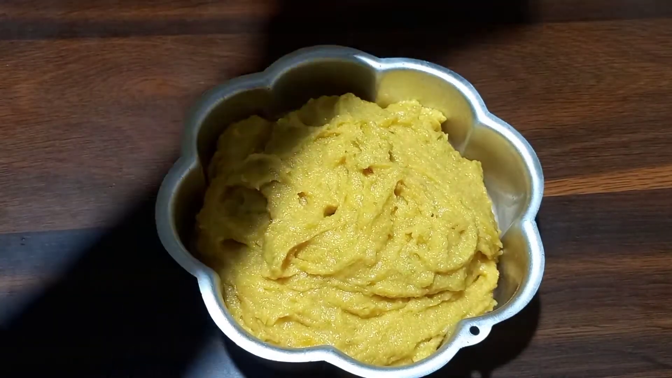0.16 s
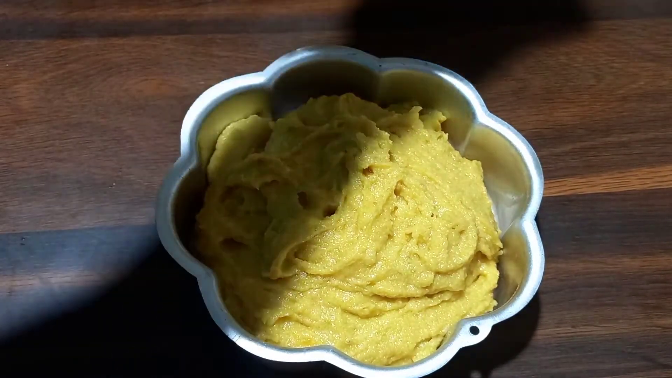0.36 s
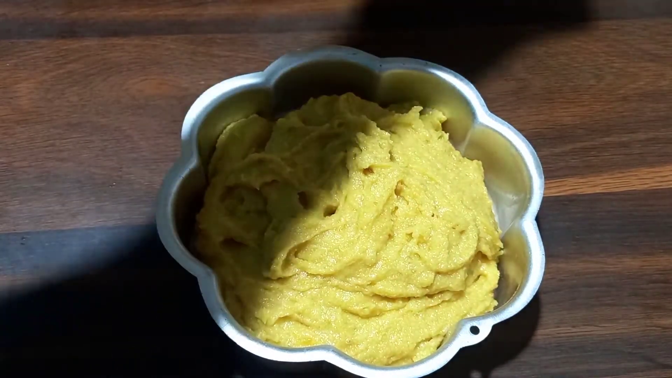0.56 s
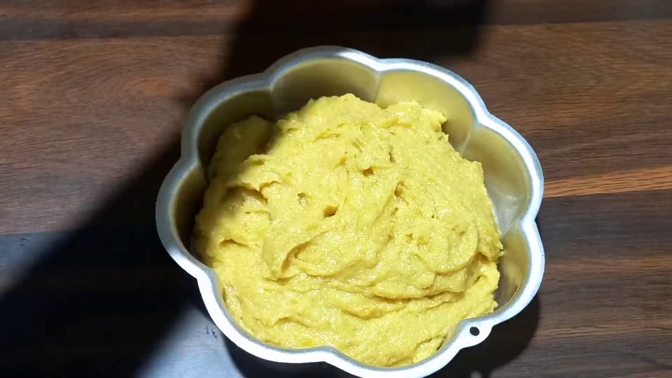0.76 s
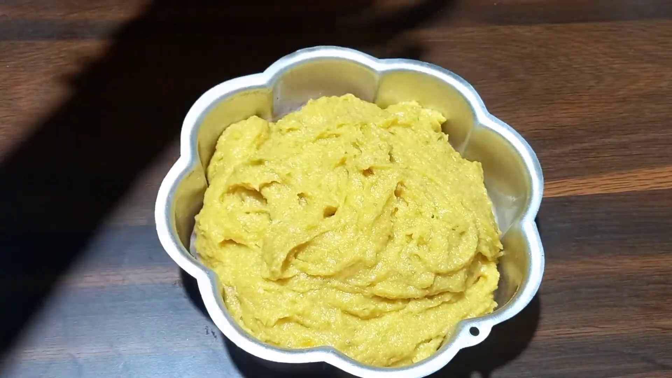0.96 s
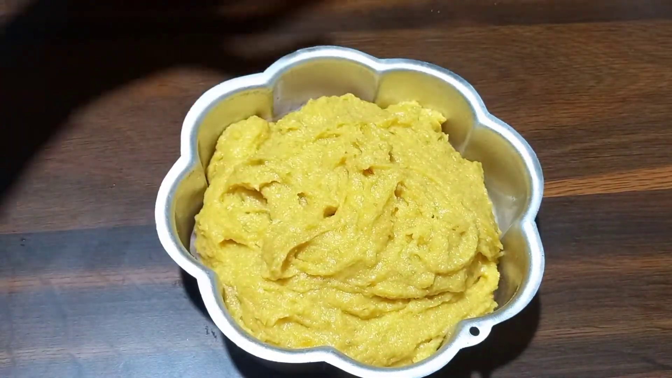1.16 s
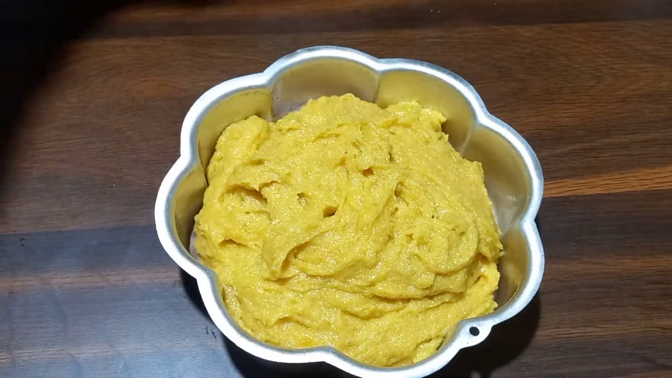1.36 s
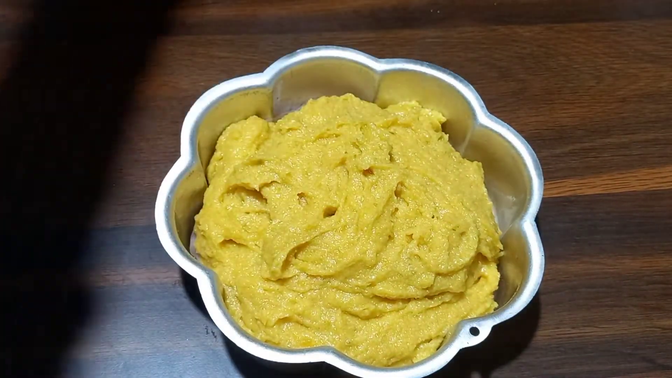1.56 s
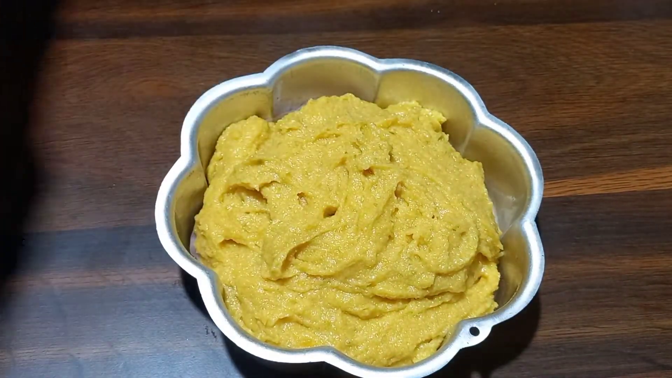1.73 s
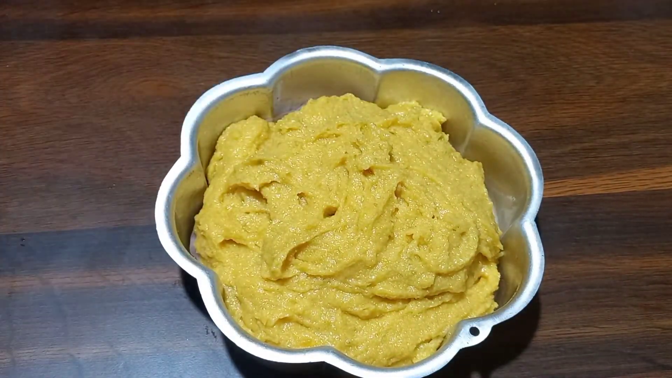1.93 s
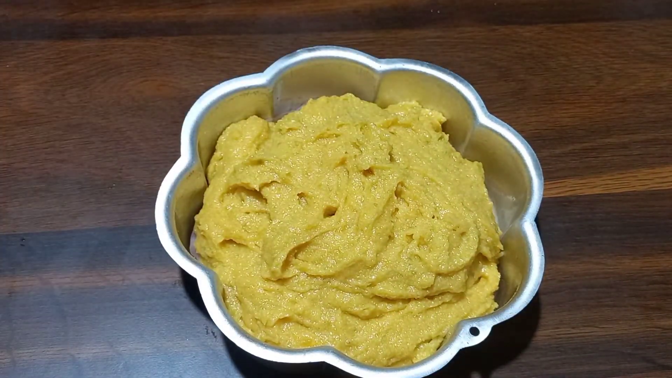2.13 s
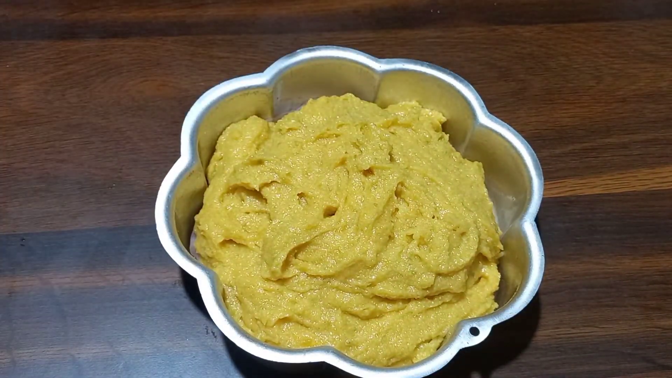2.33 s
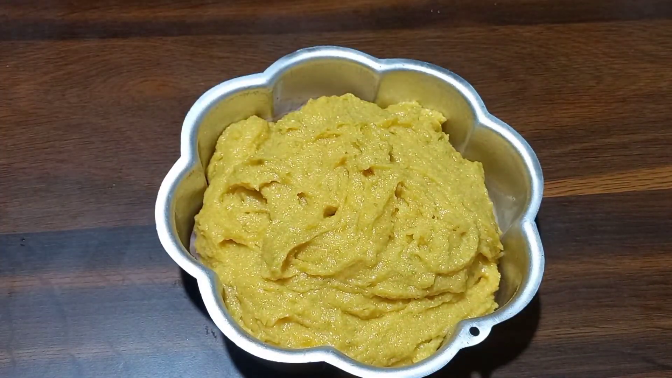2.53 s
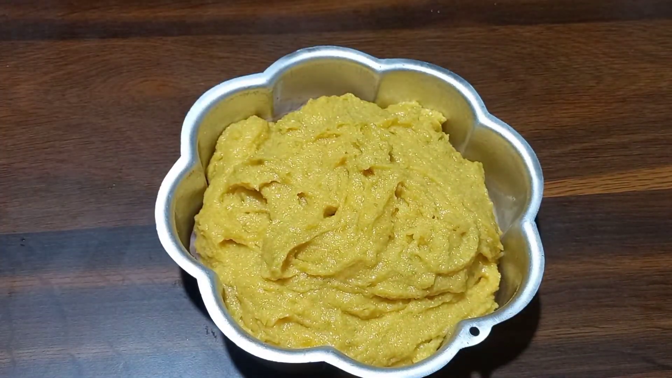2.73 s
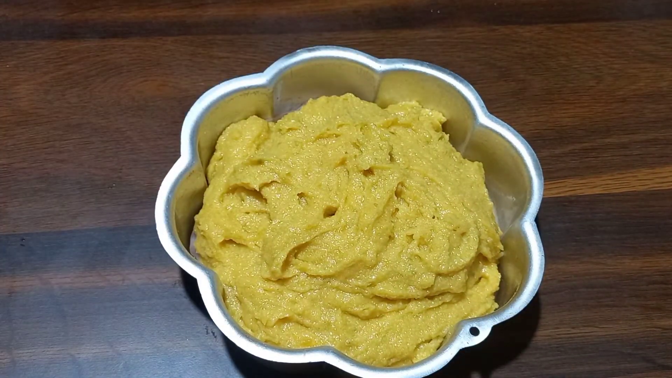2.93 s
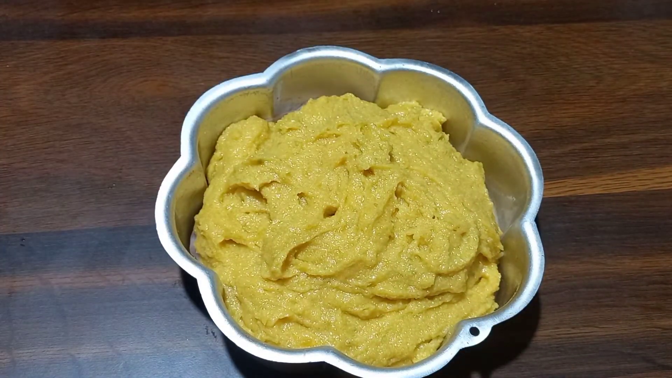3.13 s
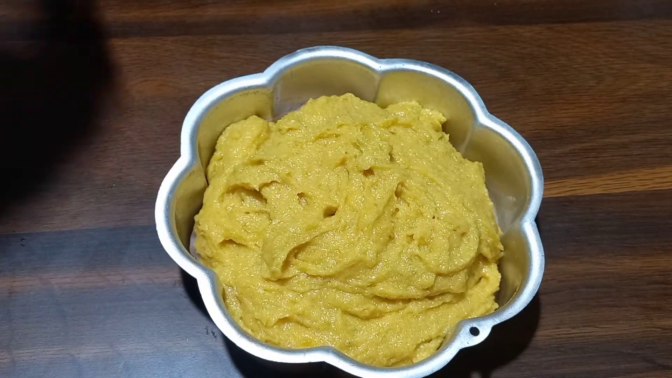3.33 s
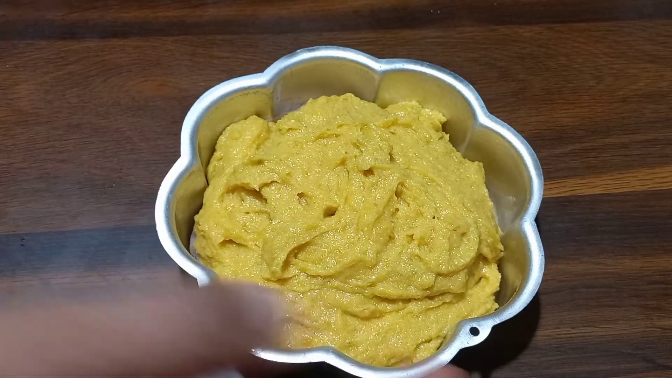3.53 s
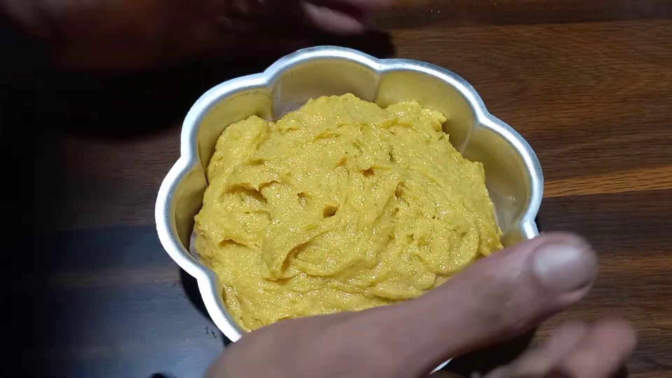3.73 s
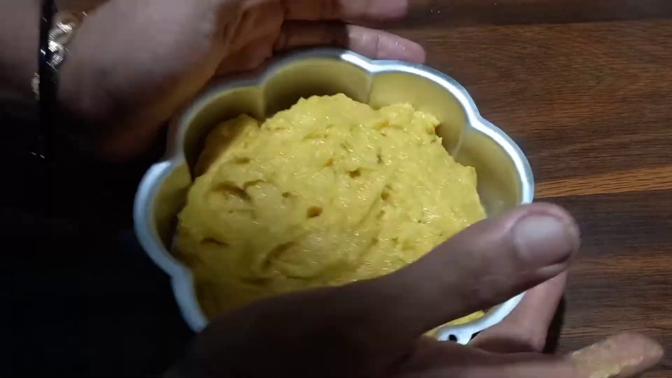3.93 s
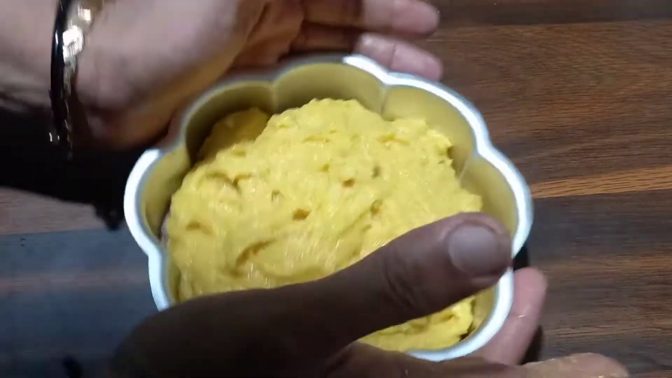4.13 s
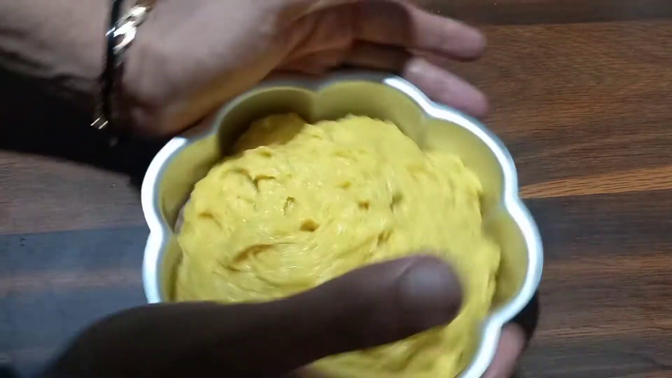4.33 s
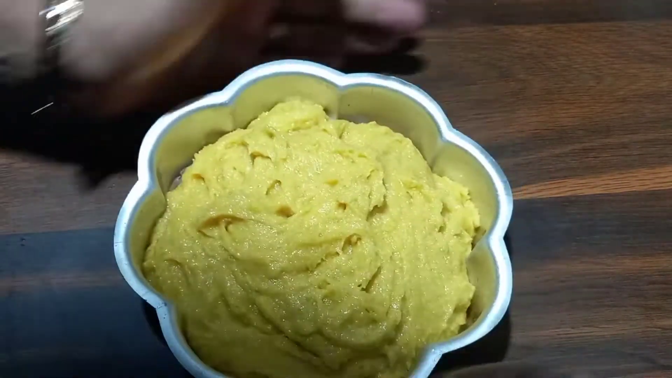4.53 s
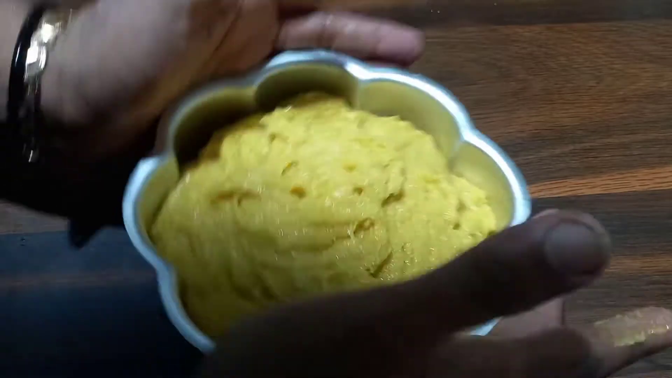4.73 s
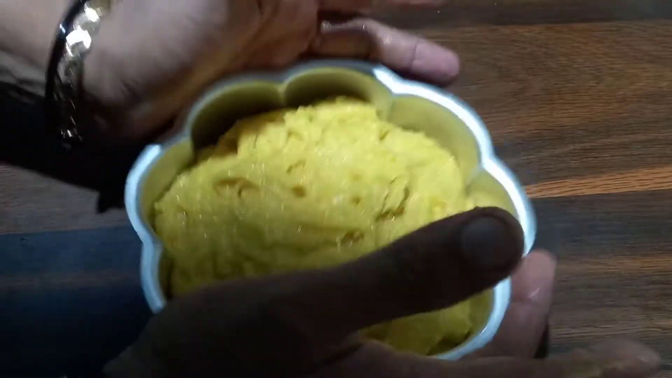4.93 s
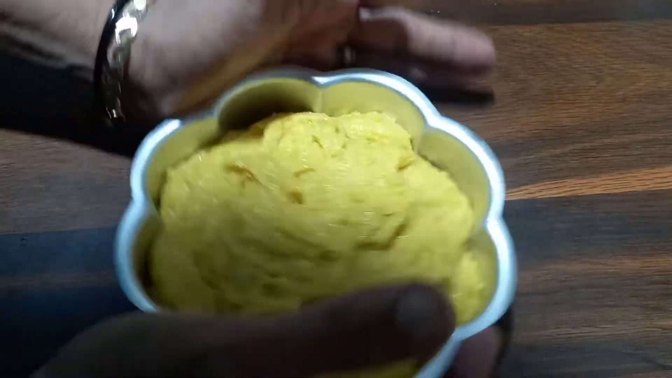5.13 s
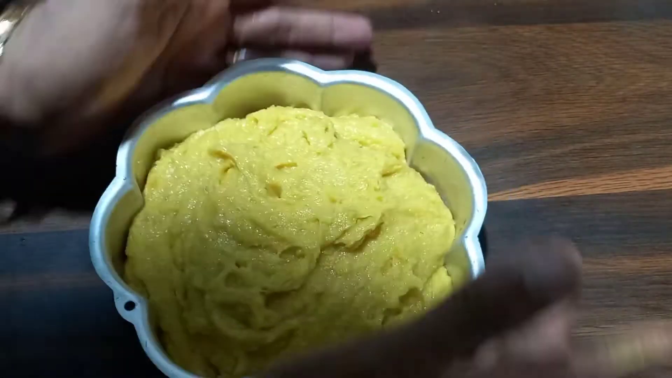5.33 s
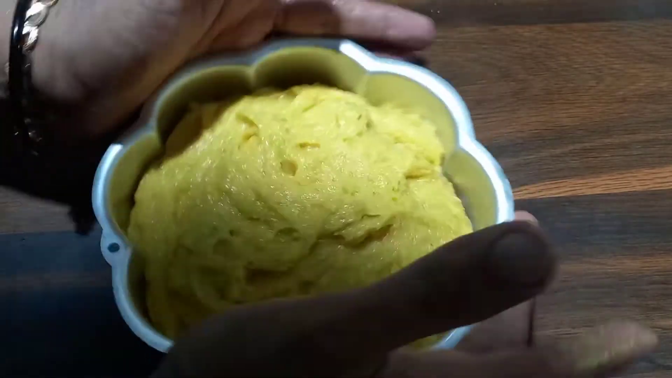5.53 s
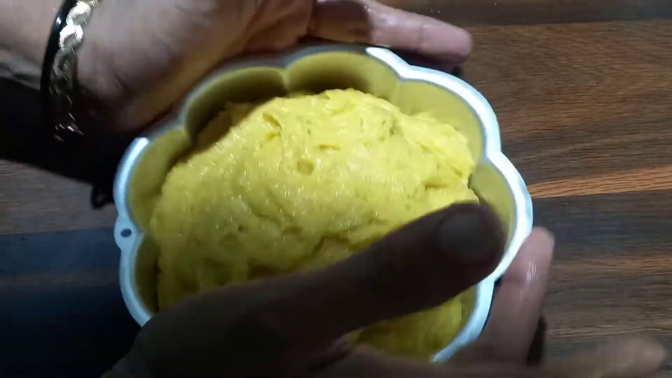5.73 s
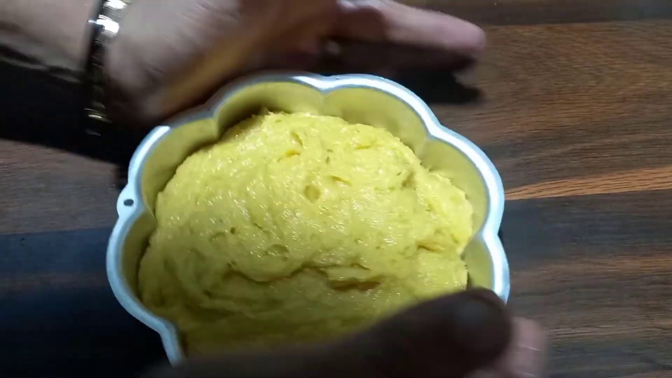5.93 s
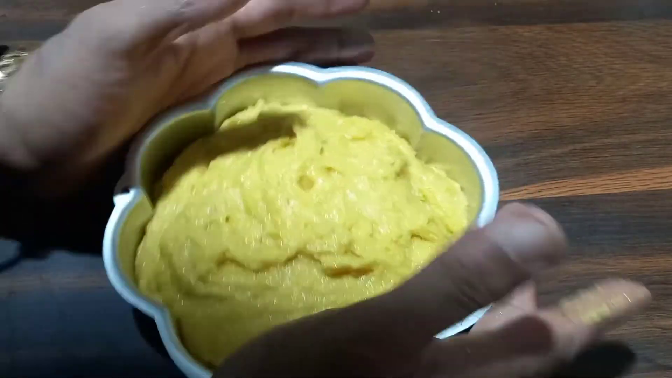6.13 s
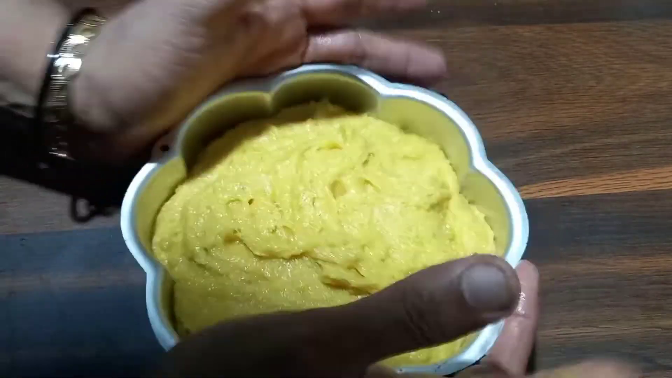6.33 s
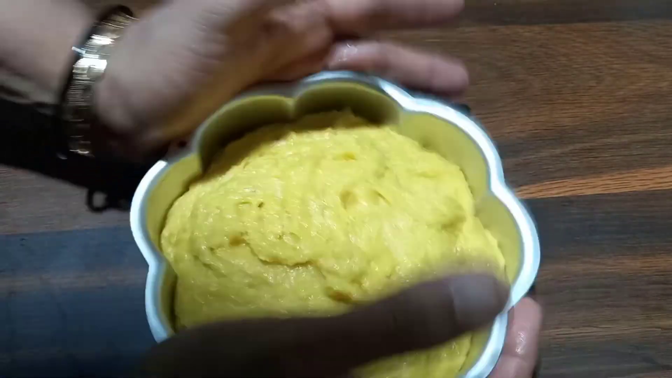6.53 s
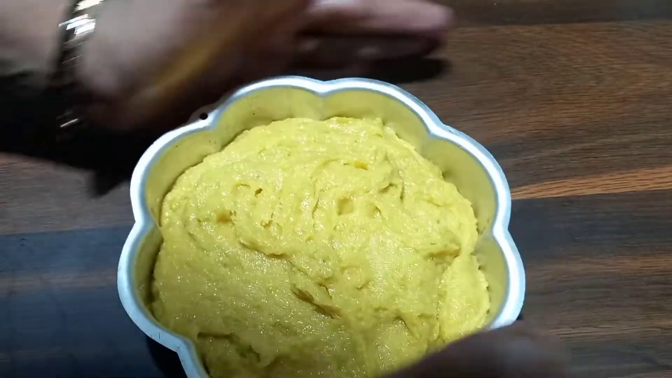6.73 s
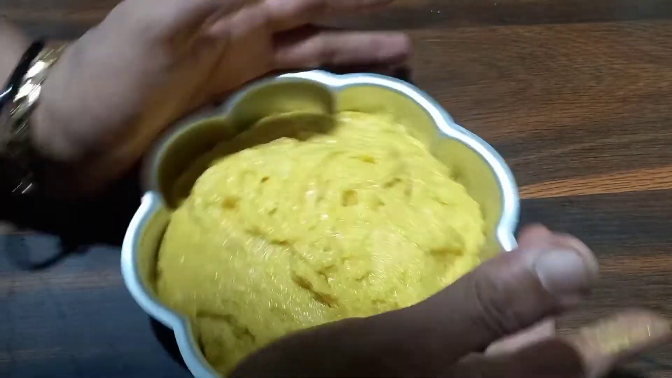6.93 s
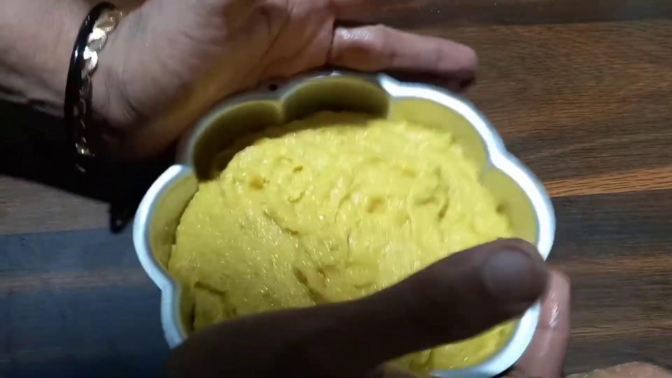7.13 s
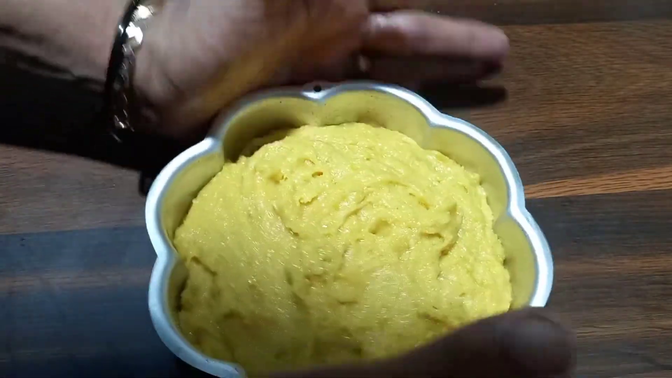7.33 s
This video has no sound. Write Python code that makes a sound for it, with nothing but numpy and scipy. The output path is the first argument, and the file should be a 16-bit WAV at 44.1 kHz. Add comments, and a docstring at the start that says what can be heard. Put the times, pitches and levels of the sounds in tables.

```python
"""Two dull, hollow bumps and a few faint scrapes sound in a small, hard kitchen. Then a metal cake tin
full of batter is lifted and knocked down on a wooden counter, in five pairs of knocks. Each impact
excites a thud of the base and a clank of the wall, both damped by the batter; the counter booms in
its low modes and the room reverberates. Two charms on the cook's bracelet tinkle as the wrist moves
and after each knock."""
import sys
import numpy as np
from scipy import signal
from scipy.fft import rfft, irfft
from scipy.io import wavfile
from scipy.ndimage import uniform_filter1d

SR = 44100
rng = np.random.default_rng(int(sys.argv[2]) if len(sys.argv) > 2 else 0)


def store_wav(level_fs):
    """Save 16-bit WAV to argv[1]."""
    pcm = np.round(np.clip(np.atleast_2d(level_fs), -1, 1) * 32767)
    wavfile.write(sys.argv[1], SR, pcm.T.astype(np.int16))


N = 329868
TIME = np.arange(N) / SR

# The tin lands on an edge, falls flat, then rocks once. Levels in all tables are relative.
# (time [s], edge level [dB], wall's share of edge [0-1], fall time [s], flat level [dB],
#  wall's share of flat [0-1], rock time [s], weight on counter [dB], bracelet jolt [dB])
KNOCKS = [(4.0766, -14, 0.17, 0.011, -9.5, 0.98, 0.0098, -31.5, -40.5),
          (4.2803, -18.5, 0.02, 0.0041, -9.5, 0.55, .018, -30, -43),
          (4.8728, -11, 0.98, 0.0089, -15.5, .8, 0.013, -35.5, -43),
          (5.0276, -8, 0.08, .0219, -11.5, 0.94, .016, -32.5, -42),
          (5.6244, -12.5, 0.85, .0036, -14.5, 0.94, .02, -38, -52),
          (5.7974, -14, 0.04, .0108, -11.5, 0.24, 0.0037, -35, -48.5),
          (6.331, -13, 0.24, .0154, -11, 0.78, .017, -30.5, -46),
          (6.5039, -13, 0.19, 0.016, -12, 0.55, .005, -32, -49),
          (7.065, -14, 0.59, 0.014, -10.5, 0.38, 0.0034, -38.5, -68),
          (7.213, -14, 0.14, 0.026, -10.5, 0.34, .004, -36, -46.5)]


def from_db(db):
    """Amplitude grows tenfold with every 20 dB."""
    return 10 ** (np.asarray(db) / 20)


def at_hz(points, hz):
    """Interpolation on a logarithmic frequency axis."""
    known_hz, values = np.transpose(points)
    return np.interp(np.log(np.maximum(hz, 1)), np.log(known_hz), values)


def unit_energy(x):
    """Energy normalisation: each channel's squares sum to one."""
    return x / np.sqrt(np.sum(x ** 2, axis=-1, keepdims=True) + 1e-20)


def through(x, response):
    """A linear system convolves its input with its impulse response."""
    return signal.oaconvolve(np.atleast_2d(x), np.atleast_2d(response), axes=-1)[:, :N]


def coloured(x, spectrum, size=4096):
    """Minimum-phase filtering: a causal response of the given spectral shape and unit energy."""
    hz = np.arange(size // 2 + 1) * SR / size
    cepstrum = irfft(np.log(from_db(at_hz(spectrum, hz))))
    cepstrum[1:size // 2] *= 2
    cepstrum[size // 2 + 1:] = 0
    return through(x, unit_energy(irfft(np.exp(rfft(cepstrum)))))


def stereo_noise(count, apart_hz, width):
    """Interaural coherence: noise is alike at both ears in the bass and differs above apart_hz."""
    mid, side = rng.standard_normal((2, count))
    side = width * signal.lfilter(*signal.butter(1, apart_hz, "high", fs=SR), side)
    return np.array([mid + side, mid - side]) / np.sqrt(1 + width ** 2)


def flattened(x):
    """Spectral whitening gives a burst about the same energy density in every band."""
    spectrum = rfft(x)
    power = uniform_filter1d(np.mean(np.abs(spectrum) ** 2, axis=0), size=160)
    return unit_energy(irfft(spectrum / np.sqrt(power + 1e-20), x.shape[1]))


def impacts(times, levels_db, snap, rise_s, crack_t60, tail_db, tail_t60, apart_hz, width, size=8192):
    """Impact transients: an impulse (snap), a noisy crack of dense modes and a weaker, longer tail."""
    out, t = np.zeros((2, N + size)), TIME[:size]
    decay = from_db(-60 * t / crack_t60) + from_db(tail_db - 60 * t / tail_t60)
    envelope = decay * (1 - np.exp(-t / rise_s))
    for s, level_db in zip(times, levels_db):
        burst = unit_energy(stereo_noise(size, apart_hz, width) * envelope)
        burst[:, 0] += snap
        start = int(s * SR)
        out[:, start:start + size] += from_db(level_db) * flattened(burst) * (1 - t / t[-1])
    return out[:, :N]


def ringing(times, levels_db, modes, scatter_db, pan_db, detune, phase_spread, rise_s, size=22050):
    """Modal superposition: damped sinusoids whose strength, side and pitch vary from blow to blow."""
    out, t = np.zeros((2, N + size)), TIME[:size]
    hz, mode_db, t60 = np.transpose(modes)
    decay = from_db(-60 * t / t60[:, None]) * (1 - np.exp(-t / rise_s))
    sides = np.array([[1], [-1]])
    for s, level_db in zip(times, levels_db):
        strength, side, shift, lag = rng.standard_normal((4, len(hz)))
        gain = from_db(level_db + mode_db + scatter_db * strength + pan_db * side * sides)
        angle = (2 * np.pi * (hz * (1 + detune * shift))[:, None] * t).astype(np.float32)
        phase = phase_spread * lag * sides   # each mode reaches the two ears out of step
        start = min(int(s * SR), N)
        out[:, start:start + size] += (gain * np.cos(phase)) @ (decay * np.sin(angle))
        out[:, start:start + size] += (gain * np.sin(phase)) @ (decay * np.cos(angle))
    return out[:, :N]


def still_air():
    """Ambient noise: a faint, stationary background, strongest in the bass."""
    # room tone (frequency [Hz], level [dB])
    air_spectrum = [(18, -47.5), (30, -18), (86, 1), (161, -11.5), (204, -16), (499, -18), (937, -27),
                    (2120, -28), (3870, -33.5), (4420, -21.5), (5590, -23.5), (7090, -14), (7870, -31.5),
                    (14800, -34), (16000, -44.5)]
    return from_db(-66.5) * coloured(stereo_noise(N, apart_hz=300, width=0.94), air_spectrum)


def kitchen(x, build_s=0.0045, size=32768):
    """Reverberation: dense reflections build up, then decay exponentially at each band's own rate."""
    # colour of the reflections (frequency [Hz], level [dB])
    room_spectrum = [(50, -11), (150, 8.5), (270, 3), (480, 1), (1000, 1), (2000, -3), (4000, -2.5),
                     (7000, -4.5), (15000, 4)]
    # reverberation time (frequency [Hz], T60 [s])
    room_t60 = [(80, 0.78), (250, 0.41), (500, 0.55), (2000, 0.58), (5000, 0.53), (9000, 0.47),
                (15000, 0.28)]
    t, hz = TIME[:size], np.arange(size // 2 + 1) * SR / size
    noise, response = rfft(stereo_noise(size, apart_hz=280, width=0.67)), 0
    centres = np.geomspace(60, 16000, 12)
    for centre, band_weights in zip(centres, np.eye(len(centres))):
        band = irfft(noise * at_hz(np.column_stack([centres, band_weights]), hz))
        response = response + band * from_db(-60 * t / at_hz(room_t60, centre))
    response = unit_energy(response * (1 - np.exp(-(t / build_s) ** 2)))
    return through(x, coloured(response, room_spectrum))


def stroke_envelopes(strokes, attack_s, release_t60):
    """Sustained excitation: each stroke swells, holds and decays; one envelope per level column."""
    out = 0
    for s, length_s, *levels_db in strokes:
        attack = np.clip((TIME - s) / attack_s, 0, 1)
        release = from_db(-60 * np.clip((TIME - s - length_s) / release_t60, 0, 2))
        out = out + from_db(levels_db)[:, None] * attack * release
    return out


def scrapes():
    """Stick-slip friction excites four resonant regions, grainy as the surfaces catch and slip."""
    # dull slides as things are moved (time [s], length [s], drag level [dB], hollow level [dB])
    slides = [(0.40, 0.053, -58, -33.5), (0.76, 0.042, -39, -38), (1.25, 0.023, -66, -70),
              (1.41, 0.097, -69, -66.5), (1.53, 0.11, -48.5, -55.5), (1.75, 0.044, -54, -53.5),
              (1.85, 0.31, -68, -59.5), (3.11, 0.045, -69.5, -69), (3.67, 0.17, -85, -61.5)]
    # light, bright scrapes (time [s], length [s], rasp level [dB], hiss level [dB])
    light_scrapes = [(0.05, 0.017, -56.5, -72), (0.46, 0.041, -44, -56.5), (0.555, 0.069, -50, -60.5),
                     (0.79, 0.03, -44.5, -53.5), (1.195, 0.054, -72, -60), (1.55, 0.1, -71.5, -64),
                     (1.75, .03, -65, -59), (1.845, .09, -61, -55.5), (3.81, .1, -74, -78)]
    # friction spectra, low to high (frequency [Hz], level [dB])
    drag_spectrum = [(60, -21), (130, -13.5), (175, -0.5), (230, 3), (290, -2.5), (400, -39.5), (4000, -60)]
    hollow_spectrum = [(250, -25.5), (350, 0), (415, -1.5), (500, 1), (580, -10), (800, -26), (1400, -37),
                       (6000, -65.5)]
    rasp_spectrum = [(700, -11), (1020, -8.5), (1170, 0), (1380, -8), (1750, -3), (1950, 1.5), (2150, -8),
                     (2500, -13.5), (4000, -30.5)]
    hiss_spectrum = [(700, -12), (1500, -5), (3200, 0), (6000, -1), (8500, -13), (15000, -20)]
    catches = uniform_filter1d(rng.standard_normal(N), size=200)
    grain = from_db(1.5 * catches / catches.std())
    drag, hollow = stroke_envelopes(slides, attack_s=0.02, release_t60=.19)
    rasp, hiss = stroke_envelopes(light_scrapes, attack_s=0.018, release_t60=.25)
    regions = [(drag_spectrum, drag), (hollow_spectrum, hollow),
               (rasp_spectrum, rasp), (hiss_spectrum, hiss)]
    return sum(coloured(stereo_noise(N, apart_hz=700, width=1) * grain * envelope, spectrum)
               for spectrum, envelope in regions)


def bumps():
    """Soft impacts excite mainly the low modes of a hollow body; each contact adds a faint tick."""
    # handling bumps (time [s], touch [dB], main blow [dB], rebound [dB], tick [dB])
    handling_bumps = [(0.284, -35.5, -11, -15, -38.5), (0.696, -25.5, -18.5, -37, -42.5)]
    # modes of the hollow body (frequency [Hz], level [dB], T60 [s])
    hollow_modes = [(81, -35, .28), (154.5, -41.5, .4), (203.6, -24, 0.17), (354, -22, 0.052),
                    (380, -27, 0.28), (400.7, -26.5, 0.28), (516, -29, 0.23), (534, -22.5, .09)]
    # contact spectra (frequency [Hz], level [dB])
    body_spectrum = [(20, -41), (48, -16.5), (80, -7.5), (130, -12), (200, -8), (290, -4), (385, 4),
                     (540, -1.5), (750, -25.5), (1500, -41), (5000, -86)]
    tick_spectrum = [(300, -4.5), (1100, 2), (1900, 3), (3000, -13.5), (6500, -9.5), (8500, -19),
                     (15000, -18.5)]
    contacts = []
    for s, touch_db, blow_db, rebound_db, tick_db in handling_bumps:
        contacts += [(s, touch_db, tick_db - 22),
                     (s + .022, blow_db - 7.5, tick_db),   # landing, ahead of the main blow
                     (s + .0355, blow_db, tick_db),
                     (s + .051, rebound_db, tick_db - 9.5)]
    times, body_db, ticks_db = np.transpose(contacts)
    body = impacts(times, body_db + 22.5, snap=0.53, rise_s=0.00089, crack_t60=.03,
                   tail_db=-20.5, tail_t60=0.069, apart_hz=300, width=0.4)
    tick = impacts(times, ticks_db + 32, snap=.1, rise_s=0.0017, crack_t60=.04,
                   tail_db=-5, tail_t60=0.31, apart_hz=1000, width=1)
    ring = ringing(times, body_db + 14, hollow_modes,
                   scatter_db=6.5, pan_db=-1, detune=0.036, phase_spread=.45, rise_s=.003)
    return coloured(body, body_spectrum) + coloured(tick, tick_spectrum) + ring


def swings(lag_s=.075, swing_s=.118, spread_s=.002, loss_db=5):
    """Damped pendulums: jolted by a knock, the charms collide, then again, weaker, a swing later."""
    clinks = []
    for s, _, _, fall_s, *_, jolt_db in KNOCKS:
        for swing, jitter in enumerate(rng.standard_normal(2)):
            clink_s = s + fall_s + lag_s + swing_s * swing + spread_s * jitter
            small_db = jolt_db - loss_db * swing
            large_db = small_db - 4.5
            clinks.append((clink_s, small_db, large_db))
    return clinks


def charm(times, levels_db, modes, bounce_s, bounce_db, count=3):
    """Inelastic rebounds: a charm strikes, then bounces on its chain at uneven gaps, ever weaker."""
    gaps = bounce_s * rng.uniform(.5, 1.5, (len(times), count))
    touches = times[:, None] + np.cumsum(gaps, axis=1) - gaps[:, :1]
    strengths_db = levels_db[:, None] + bounce_db * np.arange(count)
    return ringing(touches.ravel(), strengths_db.ravel(), modes,
                   scatter_db=2.5, pan_db=2, detune=.006, phase_spread=.6, rise_s=.002, size=5000)


def bracelet():
    """Small bodies have high modes: two charms ring, and their chain rattles and once snaps taut."""
    # clinks as the wrist moves (time [s], small charm [dB], large charm [dB])
    wrist_clinks = [(0.4524, -65, -63), (0.5844, -42, -72), (2.5915, -65.5, -68), (2.9224, -57.5, -71),
                    (3.1048, -79, -57), (3.1923, -58, -63), (3.3925, -61, -64), (3.5308, -74, -50),
                    (3.5883, -47, -76), (3.6273, -44, -57), (3.7514, -75.5, -56.5), (4.5526, -75, -54),
                    (4.613, -42.5, -56), (4.696, -41.5, -51.5), (5.4585, -48, -57), (5.5205, -66, -50.5),
                    (6.1903, -40, -56), (6.2562, -86, -51), (6.8232, -54, -49), (6.8982, -47.5, -62),
                    (6.988, -75, -57)]
    # modes of the charms (frequency [Hz], level [dB], T60 [s])
    small_modes = [(4893, -19, .1), (5114, -13, .08), (9711, 0, .055), (9790, -4, .04), (14906, -7, .04),
                   (15590, 1, .05)]
    large_modes = [(4392, -13, .08), (4909, -10, .1), (8327, -11, .07), (9320, -3, .06), (9405, -3, .06),
                   (13382, -4, .06), (15067, -1, .06)]
    # rattle of the links (frequency [Hz], level [dB])
    chain_spectrum = [(500, -34.5), (3400, -22), (4800, -3), (7000, -1), (8300, -12), (10000, 7.5),
                      (12000, -6.5), (15000, 5)]
    times, small_db, large_db = np.transpose(list(wrist_clinks) + swings())
    small = charm(times, small_db + 10, small_modes, bounce_s=0.0097, bounce_db=-3)
    large = charm(times, large_db + 7, large_modes, bounce_s=0.02, bounce_db=-1)
    links = impacts(times, np.maximum(small_db, large_db) + 34, snap=0, rise_s=0.0036, crack_t60=.06,
                    tail_db=-3, tail_t60=0.074, apart_hz=900, width=1)
    taut = impacts(times=[3.6285], levels_db=[-6], snap=.2, rise_s=.0006, crack_t60=.025,
                   tail_db=-17.5, tail_t60=0.075, apart_hz=900, width=1)
    lean_right = from_db([[-1], [1]])
    return (small + large + coloured(links + taut, chain_spectrum)) * lean_right


def tin_contacts(rock_loss_db_per_s=648.5, graze_wall_share=0.62, graze_weight_db=-80.5):
    """Dissipation over a landing (edge, flat, rock): the later the rock, the more the batter absorbs."""
    # the tin grazes the counter as it is lifted (time [s], level [dB])
    grazes = [(4.699, -47), (5.423, -52.5), (6.856, -38.5)]
    contacts = [(s, level_db, graze_wall_share, graze_weight_db) for s, level_db in grazes]
    for s, edge_db, edge_share, fall_s, flat_db, flat_share, rock_s, weight_db, _ in KNOCKS:
        loss_db = rock_loss_db_per_s * rock_s
        contacts += [(s, edge_db, edge_share, weight_db - 13),   # the edge brings part of the weight
                     (s + fall_s, flat_db, flat_share, weight_db),
                     (s + fall_s + rock_s, flat_db - loss_db, flat_share, weight_db - loss_db)]
    return np.transpose(contacts)


def tin(batter_t60=.014):
    """Impact energy divides between the damped base and wall; the weight drives the counter's modes."""
    # contact spectra of base and wall (frequency [Hz], level [dB])
    thud_spectrum = [(50, -45), (230, -14), (450, 3.5), (640, 0), (820, 2.5), (1000, -4), (1350, 5.5),
                     (2000, -1), (3200, -47.5), (4500, -5), (6700, -15.5), (7800, -33.5), (15000, -31)]
    clank_spectrum = [(30, -28), (90, -11.5), (200, -11.5), (480, -7), (1050, -11), (1600, -3), (2100, 2.5),
                      (2800, -2.5), (3700, -4), (5500, -8.5), (6800, -5.5), (7800, -19), (10500, -18),
                      (15500, -22.5)]
    # modes of the metal wall and the wooden counter (frequency [Hz], level [dB], T60 [s])
    wall_modes = [(1179, -21, 0.13), (1565, -14.5, .04), (1660, -9, 0.017), (1914, -28, 0.25),
                  (2165, -24.5, 0.1), (2090, 3, 0.009), (2370, -26.5, 0.091), (3640, -31.5, 0.099),
                  (5600, -24.5, 0.06), (6700, -27.5, 0.058)]
    counter_modes = [(59.3, 0.5, 0.18), (81.2, -0.5, 0.45), (94.6, 0, 0.22), (226, -17, 0.24),
                     (290, -16, 0.47), (356, -13.5, 0.34), (489, -11.5, 0.62), (502, -9.5, 0.57)]
    times, level_db, wall_share, weight_db = tin_contacts()
    thud_db = level_db + 10 * np.log10(1 - wall_share)
    clank_db = level_db + 10 * np.log10(wall_share)
    thud = impacts(times, thud_db + 20.5, snap=0.9, rise_s=0.00053, crack_t60=batter_t60,
                   tail_db=-18, tail_t60=0.1, apart_hz=2470, width=1)
    clank = impacts(times, clank_db + 24.5, snap=0.19, rise_s=0.00039, crack_t60=batter_t60,
                    tail_db=-11, tail_t60=0.099, apart_hz=890, width=1.3)
    wall = ringing(times, clank_db + 3.5, wall_modes,
                   scatter_db=1.76, pan_db=-1, detune=.04, phase_spread=0.72, rise_s=0.00055)
    boom = ringing(times, weight_db + 2.5, counter_modes,
                   scatter_db=4.5, pan_db=-0.7, detune=0.012, phase_spread=0.2, rise_s=.006)
    return coloured(thud, thud_spectrum), coloured(clank, clank_spectrum) + wall, boom


def scene():
    """Superposition of the direct sound, the kitchen's reverberant field and still air."""
    thud, clank, boom = tin()
    handling, charms, rubbing, air = bumps(), bracelet(), scrapes(), still_air()
    into_room = (from_db(-6.5) * thud + from_db(-3) * clank + from_db(-17.5) * boom
                 + from_db(-10.5) * handling + from_db(-12) * charms + from_db(-13.5) * rubbing)
    return thud + clank + boom + handling + charms + rubbing + kitchen(into_room) + air


def record(dry):
    """Soft saturation rounds the loudest peaks; a steep low-pass filter cuts the highest treble."""
    ceiling, stopband_hz = .98, 16400
    low_pass = signal.cheby2(16, 60, stopband_hz, fs=SR, output="sos")
    return signal.sosfilt(low_pass, ceiling * np.tanh(dry / ceiling))


dry = scene()
out = record(dry)
store_wav(out)
```